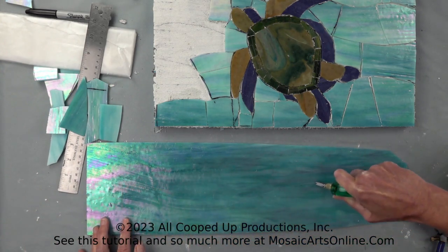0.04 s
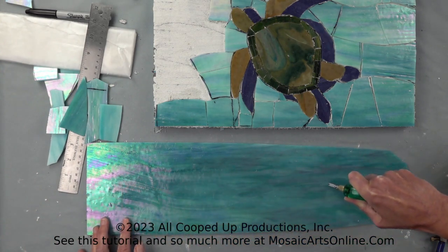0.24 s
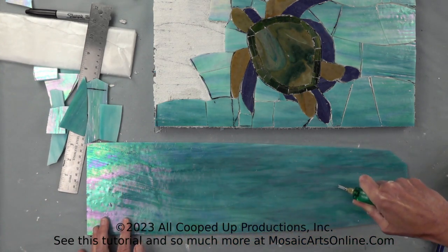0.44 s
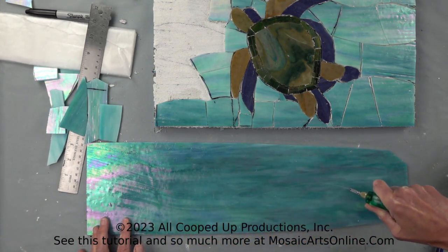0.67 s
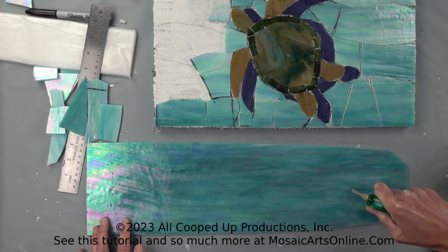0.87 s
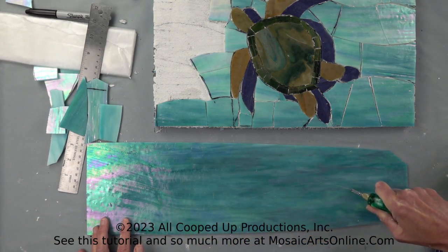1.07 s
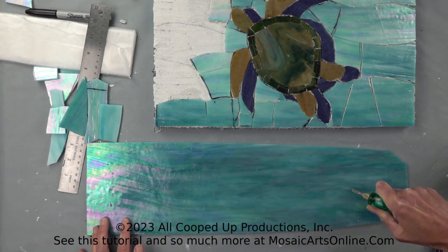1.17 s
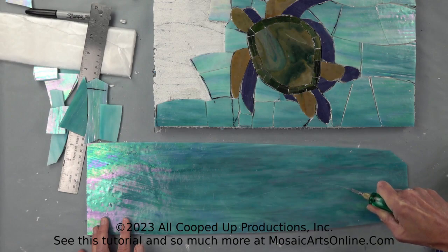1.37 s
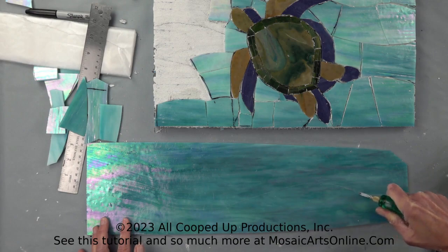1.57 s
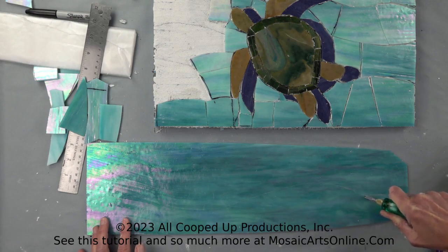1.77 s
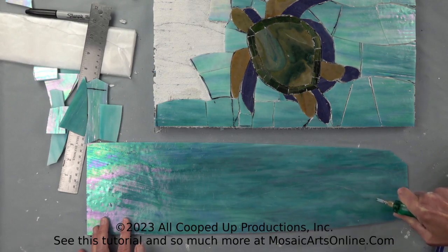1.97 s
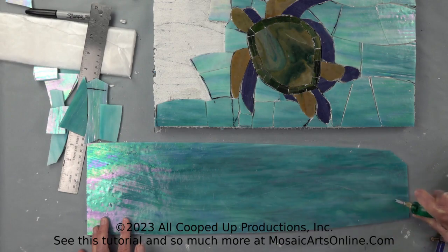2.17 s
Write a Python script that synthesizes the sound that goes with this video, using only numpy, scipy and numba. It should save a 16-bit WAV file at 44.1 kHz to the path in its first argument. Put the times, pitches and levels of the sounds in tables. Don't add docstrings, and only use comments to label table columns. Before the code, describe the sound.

A glass cutter wheel scores a thick glass sheet with a bright gritty hiss, runs off the edge with a dull table thump, pauses, then clatters briefly and scores again, close-miked in a small quiet room.

```python
import sys
import numpy as np
from scipy import signal
from scipy.fft import rfft, irfft
from scipy.io import wavfile
from scipy.ndimage import uniform_filter1d
from numba import njit

SR = 44100
rng = np.random.default_rng(int(sys.argv[2]) if len(sys.argv) > 2 else 0)


def invert_db(level):
    return 10 ** (np.asarray(level, dtype=float) / 20)


def put_to_file(sound):
    columns = np.atleast_2d(sound).T
    safe = np.clip(columns, -1, 1)
    whole_steps = np.round(safe * 32767)
    wavfile.write(sys.argv[1], SR, whole_steps.astype(np.int16))


N = 97902


def unit(x):
    return x / np.sqrt(np.mean(x ** 2))


def butter(x, order, hz, kind="low"):
    return signal.sosfilt(signal.butter(order, hz, kind, fs=SR, output="sos"), x)


def read(spectrum, hz):
    table_hz, value = np.array(spectrum).T
    return np.interp(np.log(hz + 1), np.log(table_hz), value)


def colour(x, spectrum):
    hz = np.arange(len(x) // 2 + 1) * SR / len(x)
    roll_off = 1 + (hz / spectrum[-1][0] / 1.9) ** 8
    return irfft(rfft(x) * invert_db(read(spectrum, hz)) / roll_off, len(x))


def bright(x, db):
    return butter(x, 2, 4500) * invert_db(-db / 2) - butter(x, 2, 4500, "high") * invert_db(db / 2)


def band(x, hz, width):
    spin = np.exp(2j * np.pi * np.cumsum(hz + 0 * x) / SR)
    return 2 * (butter(x / spin, 2, width / 2) * spin).real


def walk(rate):
    hold = int(SR / rate)
    steps = np.repeat(rng.standard_normal(N // hold + 1), hold)
    return unit(uniform_filter1d(uniform_filter1d(steps, hold), hold)[:N])


@njit
def modes(x, pole, gain, turn, start, steady):
    y = np.zeros(len(x))
    for m in range(len(pole)):
        z, place = 0j, start[m]
        for i in range(len(x)):
            place *= turn[m]
            z = z * pole[m] + (x[i] + 1e-18) * (steady + place.real)
            y[i] += gain[m] * z.imag
    return y


def ring(x, hz, t60, db, nodes, steady):
    hz, t60 = np.clip(hz, 20, .45 * SR), np.maximum(t60, .003)
    speed, phase = rng.random((2, len(hz)))
    pole = np.exp(2j * np.pi * hz / SR - np.log(1000) / (t60 * SR))
    turn = np.exp(2j * np.pi * nodes * speed / SR)
    gain = (-1.) ** np.arange(len(hz)) * invert_db(db) * np.sqrt(1 - abs(pole) ** 2)
    return modes(x, pole, gain, turn, np.exp(2j * np.pi * phase), 1. * steady)


# time in seconds, level in dB, brightness in dB.
STROKES = [
    [(0, -28, 10), (.08, -30.5, 6.5), (.14, -29, 2.5), (.33, -30.5, -0.5), (.55, -29.5, -0.5), (.7, -27, 1),
     (.724, -27.5, 1), (.732, -69, 4)],
    [(1.28, -79, -15), (1.36, -72.5, -23), (1.48, -59.5, -8.5), (1.535, -54.5, -5), (1.545, -75, -8)],
    [(1.541, -63, 9), (1.544, -33.5, 8), (1.565, -27.5, 9), (1.6, -26.5, 4.5), (1.65, -29.5, -4.5),
     (1.67, -41, 17), (1.69, -59, 4)],
    [(1.675, -51, -8), (1.72, -51, -8), (1.76, -47.5, -10), (1.8, -57, -7)],
    [(1.8, -51, -2), (1.82, -43, -4), (1.85, -31, -1), (1.92, -26.5, -1), (1.98, -25, -2), (2.02, -25, 0.5),
     (2.06, -26.5, 0.5), (2.14, -25.5, 1.5), (2.23, -24.5, 5)],
]


def cracking(t):
    cracks_per_s, spread_db, texture_db, biggest = 9000, 2.5, -1.5, 3.5
    strike, sign, size = rng.random((3, N))
    cracks = (strike < cracks_per_s / SR) * np.sign(sign - .5) * invert_db(-spread_db * np.log(size))
    bumps = walk(90)
    bumps = bumps - uniform_filter1d(bumps, SR // 25)
    cracks = np.clip(unit(cracks), -biggest, biggest) * invert_db(texture_db * bumps)
    score = 0
    for stroke in STROKES:
        s, db, tilt_db = np.array(stroke).T
        pressed = cracks * invert_db(np.interp(t, s, db, -200, -200))
        score = score + bright(pressed, np.interp(t, s, tilt_db))
    return score


# start in seconds, level in dB, brightness in dB, rattle decay in seconds.
KNOCKS = [(0.431, -32.5, -12, 0.0089), (1.533, -40.5, 13, 0.0015), (1.5421, -35, 0, 0.0021),
          (1.5557, -34, 1, 0.0034), (1.5638, -22, -8.5, 0.0032), (1.568, -24.5, 1, 0.0035),
          (1.588, -26.5, 5, 0.0055), (1.6608, -23.5, -8.5, 0.0021), (1.664, -21.5, -3.5, 0.0033),
          (1.667, -31.5, 10, 0.002), (1.737, -32, 0, 0.0024), (1.769, -35, -1.5, 0.0014),
          (1.8275, -32, 0, 0.0011), (1.854, -32, 2, 0.0035), (1.7273, -27.5, -5, 0.004),
          (1.75, -21.5, -9.5, 0.0029), (1.808, -43, -2, 0.0026), (1.8217, -34, 3, 0.0019),
          (1.8446, -31.5, 5, .003), (2.003, -25.5, -15.5, 0.0091)]


def knocking(t):
    knocks, noise = 0, rng.standard_normal(N)
    for s, db, tilt_db, rattle in KNOCKS:
        decay = np.exp(-np.clip((t - s) / max(rattle, 5e-4), 0, 50))
        contact = 1.94 * (t - s < 3e-4)
        knocks = knocks + bright(noise * invert_db(db) * (t >= s) * (decay + contact), tilt_db)
    return knocks


# frequency in Hz, level in dB per Hz.
SHEET = [(700, -39), (1000, -14), (1550, -9), (2300, -6), (3050, -15.5), (3700, -7.5), (7800, -7),
         (10400, -10.5), (11200, -15), (16000, -17)]


def plate(score, knocks, count=420):
    t60_s, top_t60_s, snap_db = 0.086, 0.036, 1
    hz = 950 + 15000 * (np.arange(count) + rng.random(count)) / count
    t60 = t60_s * (top_t60_s / t60_s) ** (hz / 12000)
    ringing = ring(score + knocks, hz, t60, read(SHEET, hz), 5.006, 0.94) * 0.18
    bare = colour(score + invert_db(snap_db) * knocks, SHEET) * invert_db(4.5)
    return ringing + bare


# frequency in Hz, width in Hz, level in dB.
RINGS = [
    [(1276, 210, 2), (1924, 210, 1.5), (2486, 104, -4), (2736, 330, -3), (4435, 73, -7.5), (4920, 70, -21),
     (5680, 100, -15), (7145, 151, -4), (7730, 130, -1), (8150, 260, -3.5), (9650, 220, -3),
     (10320, 230, -4.5)],
    [(1652, 115, -1), (1868, 80, 0), (2415, 180, 0), (2640, 320, 0.5), (3600, 71, -9), (4420, 53, -7.5),
     (5500, 110, -16), (6300, 120, -14), (6460, 160, -9), (7040, 120, -6), (7980, 120, -3.5),
     (8620, 100, -2.5), (9080, 100, -8)],
]


def strong_rings(force, t):
    out, swap_s = 0, 1.1
    for peaks, part in zip(RINGS, (t < swap_s, t >= swap_s)):
        hz, width, db = np.array(peaks, float).T
        out = out + ring(force * part, hz, 1.97 / width, db - 24.5, 2.503, 6.7)
    return out


# time in seconds, frequency in Hz, level in dB.
WHEEL = [(0, 3740, -23), (.2, 3630, 5), (0.4, 3580, 5), (.58, 3740, 7), (.73, 3915, 8.5), (1.3, 4350, -9),
         (1.56, 3890, 9), (1.62, 4120, 5.5), (1.75, 4020, 11.5), (1.9, 3510, 0.5), (2.03, 3890, 6.5),
         (2.12, 4300, 7.5), (2.22, 4370, 13)]


def wheel_tone(force, t):
    s, hz, db = np.array(WHEEL).T
    return band(force, np.interp(t, s, hz), 330) * invert_db(np.interp(t, s, db))


# start in seconds, end in seconds, frequency in Hz, width in Hz, level in dB.
SLIDE = [(0, 0.1, 8330, 1570, 7.5), (1.15, 1.48, 2240, 860, 11), (1.1, 1.542, 4430, 1188, 10.5),
         (1.3, 1.54, 400, 490, 16), (1.4, 1.78, 606, 300, 0), (1.9, 1.82, 600, 750, 2.5),
         (1.82, 2.23, 690, 580, -9), (2, 1.78, 4460, 1600, 3), (0, 0.42, 2470, 320, 4.5),
         (0.5, 0.91, 460, 200, -16), (2.09, 2.23, 4200, 1160, 0.5), (1.585, 2.1, 4000, 220, 8),
         (1.3, 1.61, 7100, 340, 4), (1.6, 2.1, 6800, 220, 2), (1.5, 2.2, 10000, 250, 5.5),
         (0.4, 0.59, 4430, 130, 2)]


def seating(score, knocks, t):
    force = score + 0.5 * knocks
    return sum(invert_db(db) * band(force * (t >= a) * (t < b), hz, width) for a, b, hz, width, db in SLIDE)


def sheet(score, knocks, t):
    force = score + knocks
    glass = plate(score, knocks) + wheel_tone(force, t) + strong_rings(force, t)
    return butter(glass, 5, 1090, "high") + seating(score, knocks, t)


# start in seconds, level in dB,
# centre in Hz, width in Hz.
TICKS = [(0.429, -25, 1314, 248), (0.429, -23, 1980, 900), (0.901, -49.5, 836, 494),
         (1.2452, -47, 906, 1376), (1.26, -52.5, 4700, 1200), (1.28, -61, 1200, 2000),
         (1.317, -60, 9600, 3500), (1.408, -58, 12000, 4030), (1.4882, -39, 7560, 7460),
         (1.563, -22, 1196, 245), (1.6623, -32, 1190, 347), (2.001, -31, 221.3, 89)]


def ticks(t):
    noise, out = rng.standard_normal(N), 0
    for s, db, hz, width in TICKS:
        puff = noise * (t >= s) * np.exp(-np.clip((t - s) / 0.0043, 0, 50))
        out = out + invert_db(db) * np.sqrt(SR / width / 2) * band(puff, hz, width)
    return out


# frequency in Hz, level in dB per Hz.
BOARD = [(18, -37), (30, 1), (64, 0.5), (172, -11.5), (267, -13), (333, -15.5), (380, -15), (1000, -19),
         (1300, -51), (2200, -120)]


def board(score, knocks, count=30):
    board_db, knock_db = -22, -16
    hz = 35 * 30 ** ((np.arange(count) + rng.random(count)) / count)
    db = read(BOARD, hz) + 10 * np.log10(hz / 60) + board_db
    rumble = uniform_filter1d(abs(score), 200) * rng.standard_normal(N)
    return ring(rumble + invert_db(knock_db) * abs(knocks), hz, 1.2 / np.sqrt(hz), db, 1.528, 0.75)


def edge_drop(t):
    edge_s, edge_db, edge_hz, t60_s = .718, -38, 390, 0.46
    fade = invert_db(edge_db - 60 * np.clip(t - edge_s, 0, 9) / t60_s)
    return 5 * butter((t >= edge_s) * fade * rng.standard_normal(N), 1, [90, edge_hz], "band")


# start in seconds, level in dB, pitch in Hz, decay by 60 dB in seconds.
THUMPS = [(0.018, -37.5, 272, 0.093), (0.101, -40, 56.8, 0.29), (0.537, -35, 64, 0.23),
          (0.629, -32.5, 107, 0.14), (.31, -34, 62, 0.23), (.338, -36.5, 375, 0.057),
          (0.442, -36.5, 60, 0.37), (0.726, -24, 59.3, 0.39), (1.111, -43.5, 56, 0.22),
          (1.241, -30.5, 97, 0.034), (1.568, -33, 54.5, 0.47), (1.673, -32.5, 41.5, 0.18),
          (1.87, -33.5, 63.4, 0.44), (2, -29, 59.5, 0.15)]


def thumps(t):
    out = 0
    for s, db, hz, t60 in THUMPS:
        age = np.clip(t - s, 0, 9)
        swell = 1 - np.exp(-age / 0.0026)
        out = out + invert_db(db) * np.sin(2 * np.pi * hz * age) * swell * invert_db(-60 * age / t60)
    return out


def room(x):
    t60_s, top_t60_s, room_db, spot_s = 0.3, 0.19, -7.5, .16
    t, place, out = np.arange(SR // 2) / SR, np.arange(N) / SR / spot_s, 0
    for spot in range(int(place[-1]) + 2):
        low = butter(rng.standard_normal(len(t)), 2, 7000)
        high = 1.66 * butter(rng.standard_normal(len(t)), 2, 7000, "high")
        tail = low * invert_db(-60 * t / t60_s) + high * invert_db(-60 * t / top_t60_s)
        tail = tail * (1 - np.exp(-t / 0.0094))
        here = x * np.cos(np.pi / 2 * np.clip(place - spot, -1, 1))
        out = out + signal.fftconvolve(here, tail / np.sqrt(np.sum(tail ** 2)))[:N]
    return out * invert_db(room_db)


# frequency in Hz, level in dB per Hz.
AIR = [(12, -35.5), (20, -1.5), (68, -4.5), (107, -15.5), (204, -22), (660, -29), (897, -24.5), (1440, -36),
       (16000, -48.5)]


def air():
    return unit(colour(rng.standard_normal(N), AIR)) * invert_db(-50 + 0.99 * walk(4.54))


def patches(rows, frames, size, count):
    chance = rng.random((rows // size + 1, frames // count + 1))
    return np.repeat(np.repeat(chance, size, axis=0), count, axis=1)[:rows, :frames]


# frequency in Hz, share of time-frequency patches from 0 to 1.
SIDE_SHARE = [(100, .03), (900, .2), (3500, .08), (4500, .01), (9500, 0.019), (11500, 0.43), (12300, 0.15),
              (13800, 0.47), (16000, .1)]


def apart(mid, size=1024):
    apart_db, hiss_db = -13.5, -77
    hz, _, z = signal.stft(mid, SR, nperseg=size)
    on = patches(*z.shape, size=9, count=4) < read(SIDE_SHARE, hz)[:, None]
    loose_phase = np.exp(2j * np.pi * rng.random(z.shape))
    loose = signal.istft(z * on * loose_phase, SR, nperseg=size)[1][:N]
    hiss = butter(rng.standard_normal(N), 2, [2500, 11000], "band")
    return invert_db(apart_db) * loose + invert_db(hiss_db) * hiss


def scene():
    t = np.arange(N) / SR
    score, knocks = cracking(t), knocking(t)
    near = sheet(score, knocks, t) + ticks(t)
    under = board(score, knocks) + edge_drop(t) + thumps(t)
    mid = near + room(near) + under + air()
    side = apart(mid)
    return np.array([mid + side, mid - side])


def thin_top(x, top_hz, size=1024):
    hole_share, from_hz, hole_db = 0.244, 10000, -30
    hz, _, z = signal.stft(x, SR, nperseg=size)
    share = hole_share * np.clip((hz - from_hz) / (top_hz - from_hz), 0, 1)
    gone = patches(len(hz), z.shape[-1], size=6, count=5) < share[:, None]
    return signal.istft(z * np.where(gone, invert_db(hole_db), 1), SR, nperseg=size)[1][:, :N]


def low_pass(x):
    return signal.sosfilt(signal.butter(12, 16510, fs=SR, output="sos"), x)


def record(dry):
    top_hz = 15650
    soft = np.tanh(1.395 * dry) / 1.612
    cut = signal.sosfilt(signal.ellip(12, .3, 70, top_hz, fs=SR, output="sos"), soft)
    mix = thin_top(cut, top_hz)
    return low_pass(mix)


dry = scene()
out = record(dry)
put_to_file(out)
```